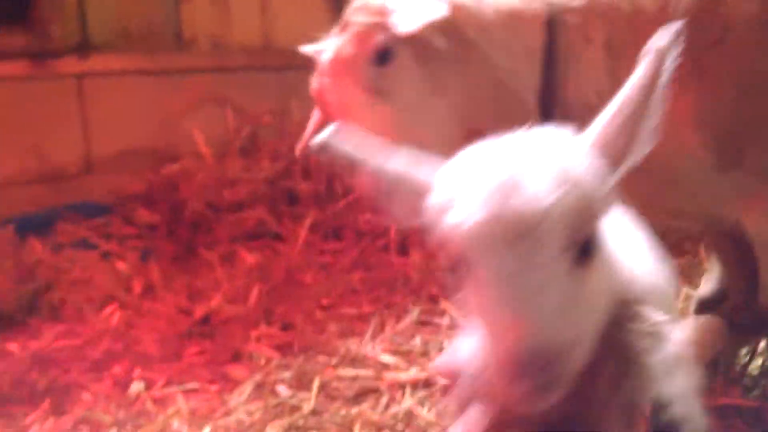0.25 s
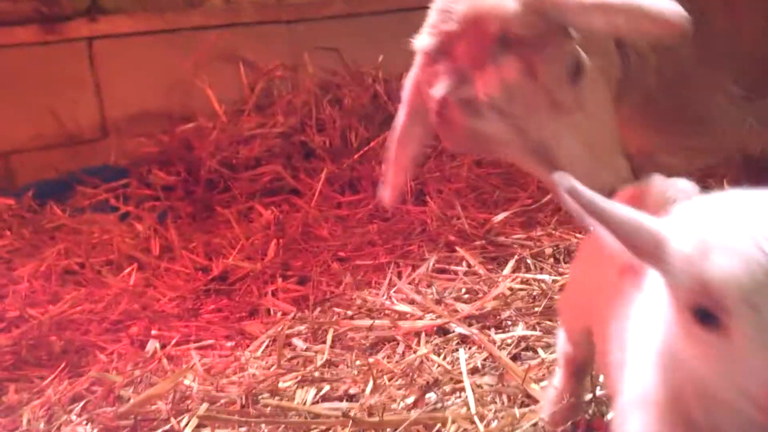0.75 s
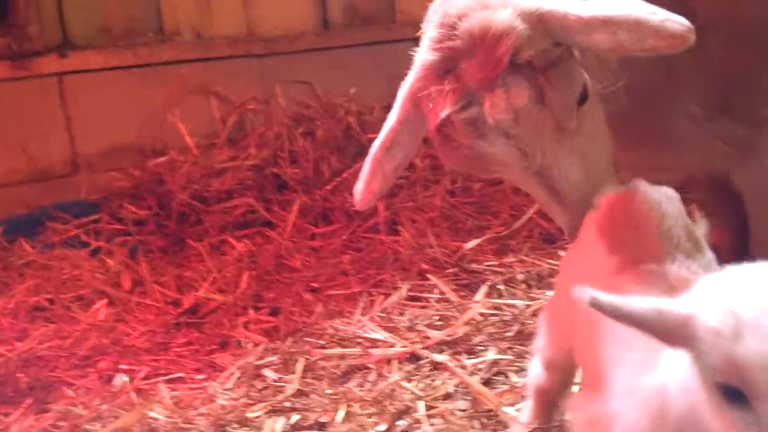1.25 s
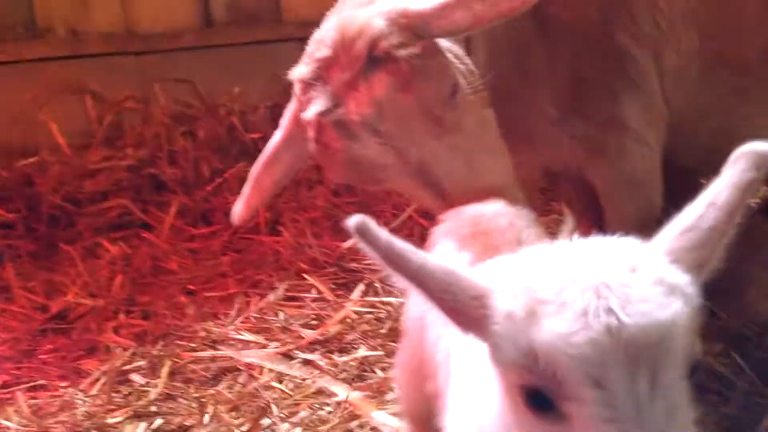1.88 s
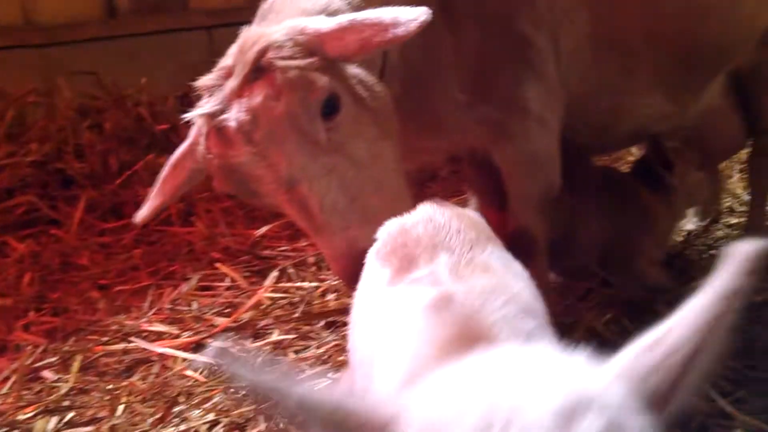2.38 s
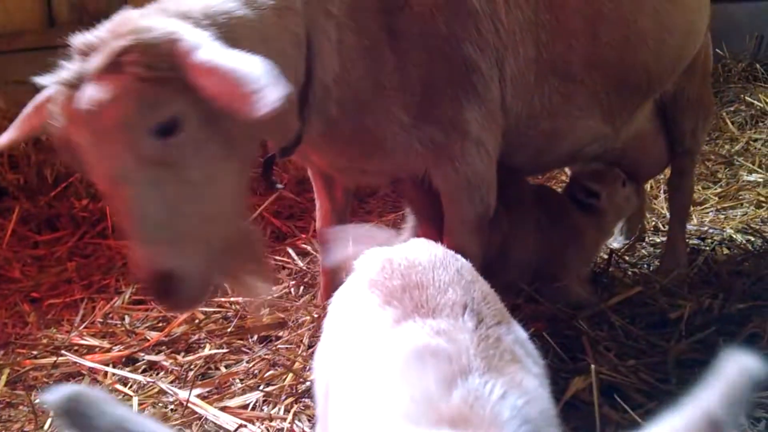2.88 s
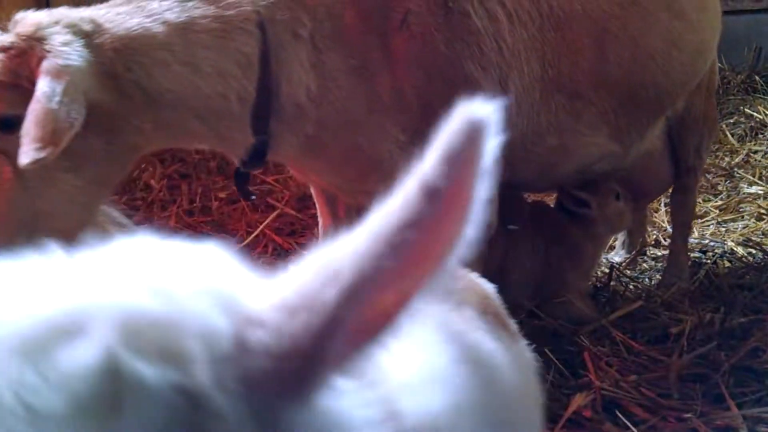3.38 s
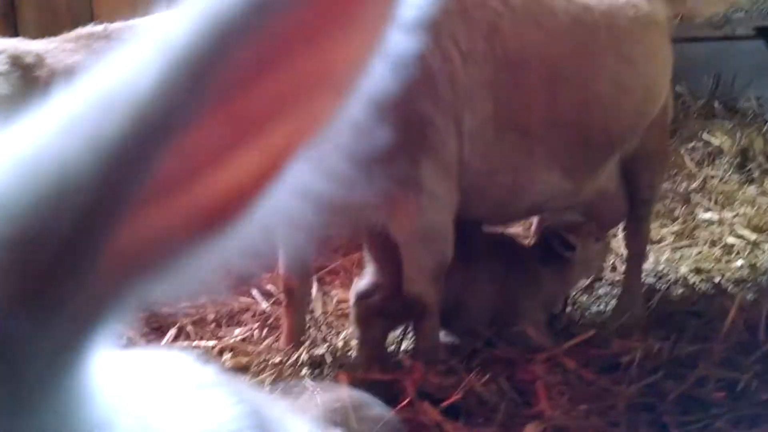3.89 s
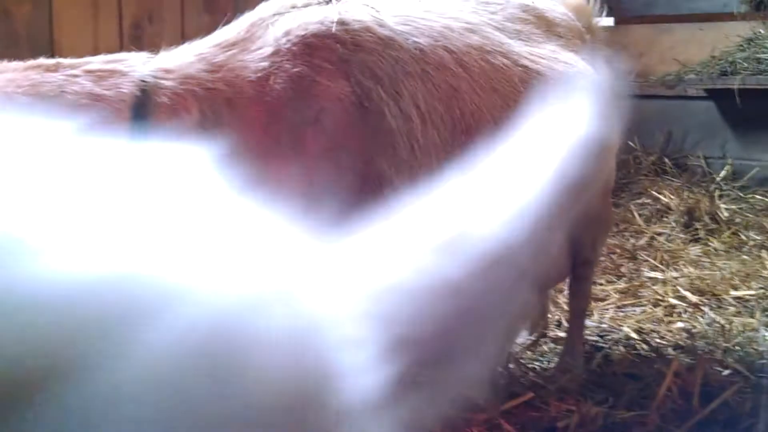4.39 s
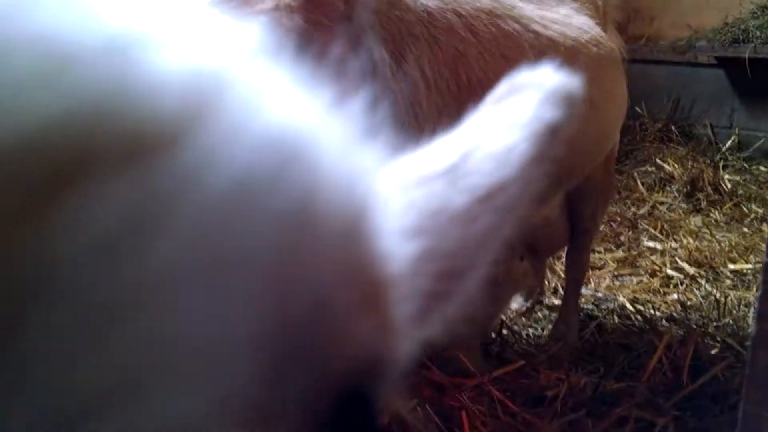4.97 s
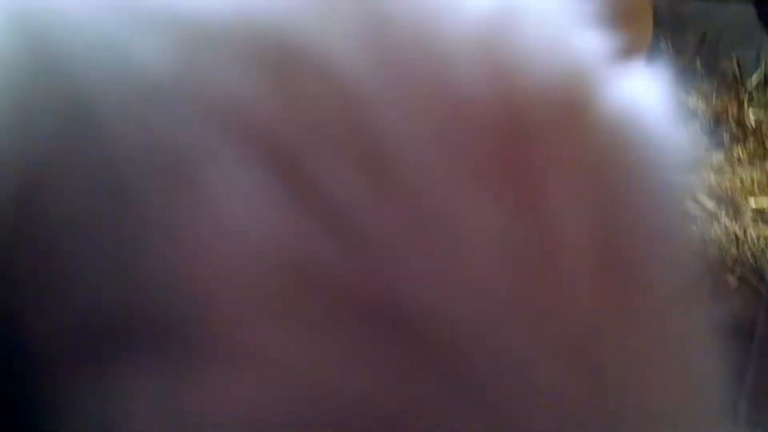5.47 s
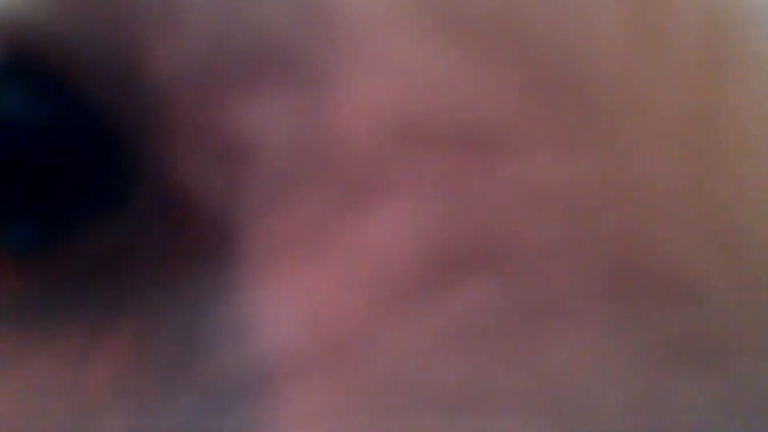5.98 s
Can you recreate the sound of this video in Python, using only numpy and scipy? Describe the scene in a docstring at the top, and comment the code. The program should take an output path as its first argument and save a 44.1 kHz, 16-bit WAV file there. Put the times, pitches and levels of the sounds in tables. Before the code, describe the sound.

A goat pen in a barn, heard close, with wide, slightly phasy stereo and brief diffuse echoes. From 0 to 1.3 seconds a young goat gives five short, nasal, cracking bleats, each about a fifth of a second, near 480 hertz. A hoarse growl follows at 1.3, thin squeaky tones at 1.5 to 1.9 and another growl at 1.7. A longer bleat rises from 1.9 to 2.4, ending in a growl, then rough quavering cries follow at 2.5, 2.8, 3.1, 3.55 and 4.0. Throughout, dry straw rustles, crackles and crunches under hooves, strongest until 4.4, with sharp stalk snaps, a tick at 3.5 and dull bumps near 4.2. After a quieter gap, faint wavering squeaks at 4.75 to 5.1 run into low, rattling growls at 4.85, 5.4, 5.65 and 5.9, dying away by about 6.3 over light straw and soft air.

```python
"""Cracked cries and growls in a goat pen

In a barn an animal gives a run of short, cracking cries, with hoarse growls among and after them.
The voice is pulse trains and noise shaped by resonances; thin tones break through it.
Goats shuffle through straw close by, made of shaped noise, with a few clicks, ticks and damped bumps.
The barn answers with brief diffuse echoes, in a wide, phasy stereo image."""
import sys
import numpy as np
from scipy import signal
from scipy.fft import rfft, irfft, next_fast_len
from scipy.io import wavfile
from scipy.ndimage import uniform_filter1d

SR = 44100
rng = np.random.default_rng(int(sys.argv[2]) if len(sys.argv) > 2 else 0)


def wrap_up_sound(samples):
    """Save the sound to the file named by the first command line argument, as 16-bit audio."""
    columns = np.atleast_2d(samples).T
    # keep every value between -1 and 1, then stretch to whole-number steps
    tamed = np.clip(columns, -1, 1)
    steps = np.round(tamed * 32767).astype(np.int16)
    wavfile.write(sys.argv[1], SR, steps)


N = 275447
TIME = np.arange(N) / SR

# animals stirring between steps: t/s, relative straw level/dB, relative level of their bodies' dull sound/dB
STIRRING = [(0, -49, -55.5), (.7, -45.5, -57.5), (1.05, -45.5, -57.5), (1.5, -43, -54.5), (2.7, -57, -56.5),
            (3.3, -35, -56.5), (3.42, -46, -67), (3.55, -47, -55.5), (3.8, -43, -55), (4.2, -54, -58),
            (4.6, -49, -60.5), (4.85, -57, -65), (5.35, -50, -61), (5.7, -51.5, -57.5), (6.05, -48.5, -49),
            (6.25, -57, -58)]
# spectrum of a stalk breaking: f/Hz, level/dB
SNAP_SPECTRUM = [(1000, -22), (4000, -12.5), (8000, -3.5), (14000, 1.5)]


def gain_of(db):
    """Level definition: an amplitude ratio is 10 to the power dB/20."""
    return 10 ** (np.asarray(db) / 20)


def evened(x):
    """Energy normalisation: scales to rms 1."""
    return x / np.sqrt(np.mean(x ** 2) + 1e-20)


def read(points, hz):
    """Spectral interpolation: reads a table along a log-frequency axis."""
    f, value = np.transpose(points)
    return np.interp(np.log(hz + 1), np.log(f + 1), value)


def follow(rows, t):
    """Linear interpolation in time: the columns of a curve table at times t."""
    s, *columns = np.transpose(rows)
    return [np.interp(t, s, c) for c in columns]


def add(mix, s, sound):
    """Superposition: mixes a sound in at time s."""
    part = mix[..., max(round(s * SR), 0):][..., :sound.shape[-1]]
    part += sound[..., :part.shape[-1]]


def filtered(x, gain):
    """Linear filtering: multiplies the spectrum by a gain given as a function of frequency."""
    size = next_fast_len(x.shape[-1] + 2048)
    spectrum = rfft(x, size) * gain(np.fft.rfftfreq(size, 1 / SR))
    return irfft(spectrum, size)[..., :x.shape[-1]]


def colour(x, points):
    """Spectral shaping: filters x by a spectrum table, at rms 1."""
    return evened(filtered(x, lambda hz: gain_of(read(points, hz))))


def low_pass(f, cut_hz, power):
    """Low-pass response: gain one half at cut_hz, steeper for a higher power."""
    return 1 / (1 + (f / cut_hz) ** power)


def wander(size, rate_hz):
    """Band-limited random modulation: Gaussian low-passed noise of rms 1."""
    return evened(filtered(rng.standard_normal(size), lambda hz: np.exp(-(hz / rate_hz) ** 2)))


def resonate(x, hz, width):
    """Moving resonance: shifts the curve hz to zero, smooths there and shifts back."""
    turn = np.exp(2j * np.pi * np.cumsum(hz) / SR)
    r = np.exp(-np.pi * width / SR)
    return 2 * (turn * signal.lfilter([1 - r], [1, -r], x / turn)).real


def background(jostle_db=4.0, sway_db=2, sway_hz=8, air_db=-57):
    """Broadband noise: dull, uneven movement of the animals over the steady air of the barn."""
    # spectrum of the bodies: f/Hz, level/dB
    dull_spectrum = [(20, -1), (60, 11.5), (120, 4.5), (190, 2), (300, 6.5), (600, -3.5), (2000, -28.5)]
    # spectrum of the steady air: f/Hz, level/dB
    air_spectrum = [(20, 50.5), (200, -9), (500, 23), (1000, 15), (1900, 31), (2400, 20), (3500, 27.5),
                    (16000, -83)]
    level_db = follow(STIRRING, TIME)[1] + jostle_db + sway_db * wander(N, sway_hz)
    jostle = colour(rng.standard_normal((2, N)), dull_spectrum) * gain_of(level_db)
    air = colour(rng.standard_normal((2, N)), air_spectrum)
    return jostle + gain_of(air_db) * air


def shuffles(width=0.38):
    """Band-limited noise: a body shifts its weight on the bedding in a rumble that swells and dies."""
    # heavy shuffles: t/s, length/s, level/dB, centre f/Hz
    shuffle_rows = [(1.25, .24, -47, 210), (2.4, 0.14, -44, 340), (2.9, .32, -54.5, 159),
                    (3.15, 0.48, -53, 156), (3.48, 0.082, -52, 44.8), (3.58, .14, -53, 310),
                    (3.72, 0.2, -52, 115), (5.12, 0.21, -56, 188), (5.4, 0.099, -50, 200)]
    out = np.zeros((2, N))
    for s, length, db, hz in shuffle_rows:
        size = int(length * SR)
        noise = rng.standard_normal((2, size))
        rumble = filtered(noise, lambda f: np.exp(-(np.log((f + 1) / hz) / width) ** 2))
        add(out, s, gain_of(db) * evened(rumble) * signal.windows.tukey(size, .7))
    return out


def bumps():
    """Damped oscillation: each bump or short tick is one heavily damped ring, in the middle channel."""
    # bumps and ticks close by: t/s, level at onset/dB, ring f/Hz, 60 dB decay time/s
    bump_rows = [(1.268, -33.5, 196, 0.23), (3.484, -17, 800, 0.0049), (2.8, -37, 160, 0.099),
                 (3.81, -21.5, 460, 0.018), (3.7, -35, 255, 0.072), (4.19, -28.5, 283, 0.037),
                 (4.217, -27, 83, 0.07), (4.216, -24, 253, 0.017), (6.01, -49, 160, 0.26)]
    out, t = np.zeros((2, N)), np.arange(SR // 2) / SR
    for s, db, hz, t60 in bump_rows:
        add(out[0], s, -gain_of(db - 60 * t / t60) * np.sin(2 * np.pi * hz * t))
    return out


def snaps(t60=0.0071, level_db=-5):
    """Impulsive fracture: a dry stalk breaks in one short bright burst of decaying noise."""
    # single stalks: t/s, relative level/dB
    snap_rows = [(0.4918, -19), (0.7317, -30), (0.871, -22), (0.985, -19), (1.706, -16), (1.888, -19),
                 (1.959, -18), (2.002, -16), (3.017, -19), (3.3369, -15), (4.053, -20), (4.155, -16.5),
                 (4.357, -25), (4.579, -23.5), (5.556, -14), (5.7879, -23), (5.8975, -28)]
    out, t = np.zeros((2, N)), np.arange(2000) / SR
    for s, db in snap_rows:
        burst = colour(rng.standard_normal((2, len(t))), SNAP_SPECTRUM)
        add(out, s, gain_of(db + level_db - 60 * t / t60) * burst)
    return out


def treading():
    """Power addition: each step swells and fades over the steady stirring; gives the rustle's strength."""
    # steps and scuffs: t at the loudest/s, relative level/dB, rise/s, fall/s
    step_rows = [(0.057, -36, 0.61, 0.94), (0.283, -37, 0.073, 0.34), (0.438, -26, 0.11, 0.071),
                 (0.518, -25.5, 0.35, 0.13), (0.887, -30, 0.075, 0.085), (0.983, -41, 0.12, 0.034),
                 (1.16, -46, 0.43, 0.044), (1.267, -32, 0.36, 0.13), (1.387, -34.5, 0.4, 0.17),
                 (1.704, -34, 0.042, 0.05), (1.78, -33, 0.16, 0.14), (1.908, -31, 0.32, 0.21),
                 (1.99, -39, 0.19, 0.17), (2.055, -36.5, 0.16, 0.1), (2.222, -34, 0.23, 0.05),
                 (2.348, -30.0, 0.34, 0.35), (2.482, -31.5, 0.25, 0.17), (2.601, -39, 0.04, 0.92),
                 (2.674, -30.5, 0.34, 0.027), (2.765, -25, 0.21, 0.19), (2.84, -32, 0.12, 0.15),
                 (3.04, -30, 0.16, 0.094), (3.133, -37.0, 0.09, 0.13), (3.256, -32, 0.053, 0.11),
                 (3.337, -38.5, 0.34, 0.057), (3.615, -35.5, 0.081, 0.2), (3.691, -35, 0.067, 0.12),
                 (3.821, -32.5, 0.1, 0.31), (3.893, -31, 0.21, 0.11), (4.065, -32, 0.084, 0.1),
                 (4.159, -35, 0.083, 0.18), (4.22, -32, 0.15, 0.07), (4.29, -40, 0.11, 0.14),
                 (4.359, -34, 0.065, 0.086), (4.447, -39, 0.18, 0.043), (5.411, -37.5, 0.07, 0.37),
                 (5.462, -42, 0.08, 0.05), (5.554, -35.5, 0.078, 0.31), (6.02, -44, 0.067, 0.26),
                 (6.19, -40.5, 0.21, 0.68)]
    drop_db = -27  # level against the peak at the ends of rise and fall
    power = gain_of(follow(STIRRING, TIME)[0]) ** 2
    for s, db, rise, fall in step_rows:
        away = np.maximum((s - TIME) / rise, (TIME - s) / fall)
        power = power + gain_of(db + drop_db * np.minimum(away, 10)) ** 2
    return np.sqrt(power)


def straw(level_db=1.5, cracks_per_s=1100, spread_db=7, crackle=0.43, crunch_db=-19, crunch_growth=0.79):
    """Random impulse noise: sliding stalks hiss, tiny snaps crackle, a dull crunch grows more slowly."""
    # spectrum of the sliding stalks: f/Hz, level/dB
    hiss_spectrum = [(600, -21), (1500, -2.5), (2400, -9), (3300, -0.5), (5000, -1), (8000, 1), (10000, 2),
                     (12500, 0.5), (14500, 3), (16000, 5)]
    # spectrum of straw packed down under a hoof: f/Hz, level/dB
    crunch_spectrum = [(100, -17), (250, -4), (500, 2), (1200, 0), (2000, -7), (2500, -27.5)]
    flicker_db, flicker_hz = 1.2, 35  # uneven sliding within a step
    crack_decay_s = 0.00049  # of the power
    size_db = spread_db * np.minimum(rng.exponential(1, N), 4)
    cracks = gain_of(size_db) * (rng.random(N) < cracks_per_s / SR)
    power = signal.lfilter([1], [1, -np.exp(-1 / (crack_decay_s * SR))], cracks ** 2)
    hiss = colour(rng.standard_normal((2, N)), hiss_spectrum)
    crackling = colour(np.sqrt(power) * rng.standard_normal((2, N)), SNAP_SPECTRUM)
    crunch = colour(rng.standard_normal((2, N)), crunch_spectrum)
    weight = treading() * gain_of(flicker_db * wander(N, flicker_hz))
    rustle = gain_of(level_db) * weight * (hiss + crackle * crackling)
    return rustle + gain_of(crunch_db) * weight ** crunch_growth * crunch


def scatter(x, bounce, gaps_s):
    """All-pass scattering: repeated bounces off near surfaces smear each pulse without colouring it."""
    def all_pass(hz):
        delays = np.exp(-2j * np.pi * np.outer(gaps_s, hz))
        return np.prod((delays - bounce) / (1 - bounce * delays), axis=0)
    return filtered(x, all_pass)


def echoes(x, t60, count=5):
    """Diffuse reverberation: a decaying tail whose random echo patterns take turns at a steady rate."""
    t, out = np.arange(SR * 3 // 4) / SR, np.zeros(N)
    place = TIME * 14  # echo patterns passed so far
    echoes_per_s, build_up_s = 2500, 0.0031
    for k in range(count):
        taps = rng.choice([-1., 1.], len(t)) * (rng.random(len(t)) < echoes_per_s / SR)
        taps *= gain_of(-60 * t / t60) * np.minimum(t / build_up_s, 1)
        # each pattern crossfades into the next
        share = np.cos(np.pi / 2 * np.minimum(abs((place - k) % count - count / 2), 1))
        out += signal.fftconvolve(x * share, taps / np.linalg.norm(taps))[:N]
    return out


def pen_ring(x):
    """Modal resonance: a few modes between the walls keep ringing after each call."""
    # lingering modes: f/Hz, time to fall by about 26 dB/s, strength/dB
    mode_rows = [(500, 0.38, -23), (944, 0.7, -11), (990, 0.81, -13)]
    return sum(gain_of(db) * resonate(x, np.full(N, hz), 0.97 / fall_s) for hz, fall_s, db in mode_rows)


def barn(clear, hoarse, growl, t60=0.31, tail_db=-2.5, wall_t60=0.11, across_db=-2, bounce=0.58,
         clear_tail_db=-8, growl_bounce=.55, growl_db=-1, growl_wet_db=-3):
    """Direct and diffuse fields: the voice and its scatter lie in the middle, wall echoes all round."""
    gaps_s = [.0013, .0029, .0047]
    near_hoarse = 0.62 * scatter(hoarse, bounce, gaps_s)
    near_growl = gain_of(growl_db) * scatter(growl, growl_bounce, gaps_s)
    voice = clear + hoarse + growl
    sent = hoarse + gain_of(growl_wet_db) * growl + gain_of(clear_tail_db) * clear
    tail = gain_of(tail_db) * echoes(sent, t60)
    mid = clear + near_hoarse + near_growl + pen_ring(voice) + tail
    side = gain_of(across_db) * echoes(voice, wall_t60) + gain_of(tail_db) * echoes(voice, t60)
    return np.array([mid, side])


def voiced(x, effort_db):
    """Envelope control: levels x to the effort curve, with a quick start and end."""
    power = uniform_filter1d(x ** 2, size=1000) + 1e-9
    return gain_of(effort_db) * x / np.sqrt(power) * signal.windows.tukey(len(x), 400 / len(x))


def squeak(s, length, start_hz, end_hz, db, octave_db, unsteady):
    """Frequency modulation: the hoarse voice catches on a short, unsteady tone with its octave."""
    size = int(length * SR)
    fade_db = -7 * np.linspace(0, 1, size)
    hz = np.linspace(start_hz, end_hz, size) * (1 + unsteady * wander(size, 170))
    phase = 2 * np.pi * np.cumsum(hz) / SR
    tone = np.cos(phase) + gain_of(octave_db) * np.cos(2 * phase)
    return s, voiced(tone, db + fade_db)


def push(t, swell, hold, release):
    """Breath pressure: the share of swell still to come and of release passed, each 0-1."""
    return np.clip(1 - t / swell, 0, 1), np.clip((t - swell - hold) / release, 0, 1)


def rasp(row, drift=0.015, onset_chest_db=3, throat_db=-7, throat_width_hz=70):
    """Source and filter: slowly flapping folds growl, slaps and air passing drifting resonances."""
    # throat spectrum of the growl: f/Hz, level/dB
    hoarse_spectrum = [(120, -46), (190, -13.5), (270, -22), (430, -0.5), (580, 1), (700, 1), (800, 1),
                       (930, 1), (1150, -3), (1360, -0.5), (1480, -10), (1580, -8), (1900, -13),
                       (2100, -16), (2350, -26), (2900, -14.5), (3400, -21.5), (3850, -32), (4400, -28.5),
                       (5400, -31), (6200, -26.5), (7200, -35), (9000, -42.5)]
    release_end_db = -15
    pulse_db, pulse_hz = 2, 41.7  # uneven pulsing of the effort
    flap_drift, flap_jitter = .04, .12  # slow and quick unevenness, as shares of the rate
    slap_spread_db, air_share = 3.5, .45
    nasal_hz, nasal_width_hz = 3790, 250
    (start, swell, hold, release, onset_db, top_db, chest_db, mouth_hz, width_hz, ring_db,
     upper_hz, upper_db, nasal_db, flap_hz, throat_hz) = row
    t = np.arange(0, swell + hold + release, 1 / SR)
    size = len(t)
    opening, closing = push(t, swell, hold, release)
    effort_db = top_db + onset_db * opening + release_end_db * closing + pulse_db * wander(size, pulse_hz)
    jaw = 1 + drift * wander(size, 8.6)

    # one slap for each flapping cycle, with most air just after it
    rate_hz = flap_hz * np.exp(flap_drift * wander(size, 12) + flap_jitter * wander(size, 150))
    cycles = np.cumsum(rate_hz) / SR
    slaps = np.diff(np.floor(cycles), prepend=0) * gain_of(slap_spread_db * rng.standard_normal(size))
    air = evened((.4 + np.exp(-(cycles % 1) / .3)) * rng.standard_normal(size))
    drive = evened(slaps) + air_share * air

    def twice(x, hz, first_hz, second_hz):
        """Cascaded resonance: two passes of given widths, at rms 1."""
        return evened(resonate(resonate(x, hz * jaw, first_hz), hz * jaw, second_hz))

    throat = colour(drive, hoarse_spectrum)
    under = filtered(throat, lambda f: low_pass(f, 830, 16))
    throat_ring = evened(resonate(under, throat_hz * jaw, throat_width_hz))
    hollow = evened(under) + gain_of(throat_db) * throat_ring
    ring = twice(throat, mouth_hz, width_hz, 600)
    upper = twice(drive, upper_hz, 400, 370)
    nasal = twice(drive, nasal_hz, nasal_width_hz, nasal_width_hz)
    mouth = evened(throat - under) + gain_of(ring_db) * ring
    mouth = mouth + gain_of(upper_db) * upper + gain_of(nasal_db) * nasal
    chest_effort_db = effort_db + chest_db + onset_chest_db * opening
    return start, voiced(mouth, effort_db) + voiced(hollow, chest_effort_db)


def cry(curve, quaver=0.0053, half_depth=1.8, flutter_depth=2.25, flutter_ratio=.26, shimmer_db=5.0,
        split_hz=1650, ring_db=-1.86, low_db=-2, body_db=0.84, bright_db=3, edge_db=-7, edge_rough=2,
        upper_db=8, upper_width_hz=230):
    """Nonlinear fold vibration: clear harmonics; roughness doubles the period, flutters and leaks air."""
    # throat spectrum of the cries: f/Hz, level/dB
    throat_spectrum = [(200, -24), (380, -21.5), (490, -6), (640, -17), (760, -7), (980, 2.5), (1110, 4.5),
                       (1250, -3), (1480, -12.5), (1680, -16), (1950, -16), (2250, -58), (2480, -16.5),
                       (2750, 0), (3500, -1.5), (6200, -12.5), (9000, -52)]
    # how the voice breaks up: t/s, roughness 0-1, share of period doubling against flutter 0-1,
    # upper resonance f/Hz
    breakup_rows = [(0.04, 0.34, 0, 2990), (.1, 0.2, 0.22, 2990), (.29, 0.83, 0.22, 3000),
                    (.37, 0.52, 0.53, 3000), (.55, 0.43, 0.09, 3120), (.8, 0.46, 0.22, 2980),
                    (1.25, 0.63, 0.2, 3020), (1.95, 0.7, 0.4, 3220), (2.08, 0.46, 0.35, 3220),
                    (2.17, 0.8, 0.7, 3100), (2.26, 0.2, 0.4, 3030), (2.35, 0.45, 0.48, 3030),
                    (2.54, 0.68, 0.85, 3000), (2.62, 0.2, 0.3, 2950), (2.86, 0.7, 0.7, 2990),
                    (2.95, 0, 0.3, 2970), (3.13, 0.46, 0.34, 3320), (3.21, 0.45, 0.75, 3360),
                    (3.6, 0.8, 0.2, 3280), (3.7, 0.21, 0.77, 3300), (3.82, 0.33, 0.65, 3280),
                    (4.2, 0.54, 0.58, 3160)]
    jitter = .005  # quick unsteadiness as a share of the pitch, before roughness scales it
    tremor_db, tremor_hz = 0.5, 30
    air_share = .4  # air noise at full roughness
    overtone_clarity = .8  # clean pulses mixed into the overtones
    clear_shimmer_db = 2  # trembling of the clear harmonics at full roughness
    start = curve[0][0]
    t = np.arange(start, curve[-1][0], 1 / SR)
    size = len(t)
    hz, ring, low, body, bright = follow(curve, t)
    rough, doubling, upper_hz = follow(breakup_rows, t)
    tremor = tremor_db * wander(size, tremor_hz)
    unsteady = quaver * wander(size, 42.0) + jitter * (.5 + 2 * rough) * wander(size, 135)
    phase = 2 * np.pi * np.cumsum(hz * (1 + unsteady)) / SR

    # period doubling puts lines halfway between the harmonics; a slower flutter adds sidebands
    half = half_depth * doubling * np.cos(phase / 2 + 0.5 * wander(size, 22))
    flutter_phase = flutter_ratio * phase + 1.24 * wander(size, 34.6)
    flutter = flutter_depth * (1 - doubling) * np.cos(flutter_phase)
    pulses = sum(np.cos(k * phase) for k in range(1, 15))
    shimmer = gain_of(shimmer_db * np.sqrt(rough) * wander(size, 78))
    folds = pulses * (1 + rough * (half + flutter)) * shimmer
    puffs = evened((1 + 2.0 * np.cos(phase)) * rng.standard_normal(size))

    # one steady copy of the two lowest harmonics is taken out here; the clear part sounds them
    upper_folds = evened(folds - np.cos(phase) - np.cos(2 * phase))
    drive = (1 - rough ** 2) * upper_folds + air_share * rough * puffs
    throat = colour(drive, throat_spectrum)
    middle = filtered(throat, lambda f: low_pass(f, split_hz, 20))
    bright_drive = throat + overtone_clarity * colour(pulses, throat_spectrum)
    overtones = filtered(bright_drive, lambda f: low_pass(f, 2400, 20) * low_pass(split_hz, f + 1, 20))

    # the edge: high harmonics, with rough folds and air growing as the voice roughens,
    # through an upper resonance of the mouth
    def edge_gain(f):
        peak = np.exp(-((f - upper_hz.mean()) / upper_width_hz) ** 2)
        return (1 - low_pass(f, 2680, 40)) * gain_of(upper_db * peak)
    edge_drive = evened(pulses) + edge_rough * rough * (puffs + evened(folds))
    edge = filtered(colour(edge_drive, throat_spectrum), edge_gain)

    second_db = ring + ring_db + tremor + clear_shimmer_db * rough * wander(size, 47)
    first_db = low + low_db + tremor + clear_shimmer_db * rough * wander(size, 64)
    clear = voiced(np.cos(2 * phase), second_db) + voiced(np.cos(phase), first_db)
    hoarse = voiced(middle, body + body_db + tremor) + voiced(overtones, bright + bright_db)
    hoarse = hoarse + voiced(edge, (bright + body) / 2 + edge_db)
    return start, np.array([clear, hoarse])


def scene():
    """Superposition: the calls in the barn and all other sources, as middle and side."""
    # one curve per cry: t/s, pitch f/Hz, then relative levels: second harmonic ringing in the mouth/dB,
    # fundamental/dB, rough body of the voice/dB, overtones/dB
    cry_curves = [
        [(0.04, 454, -32, -42, -55, -52), (0.054, 454.4, -25, -48, -34, -47),
         (0.064, 489, -29, -34, -26.5, -39), (0.078, 494.2, -21.5, -32, -33, -51),
         (0.106, 482.5, -20, -33, -23.5, -41), (0.134, 508.7, -29, -26, -36, -33),
         (0.156, 501.6, -13, -32, -27, -50), (0.178, 516.5, -44, -33, -31.5, -41),
         (0.212, 475.5, -32, -46, -38.5, -65), (0.235, 496, -39, -38, -37, -55)],
        [(0.275, 518, -42, -47, -36, -50), (0.293, 492.3, -29.5, -43, -24, -59),
         (0.309, 474, -34, -36, -37, -32), (0.333, 480.6, -26, -40, -22, -47), (0.353, 512, -24, -27, -38, -32),
         (0.375, 493, -14, -28, -21.5, -54), (0.389, 494.4, -21.5, -39, -36, -51),
         (0.401, 487, -42, -56, -42, -52), (0.409, 505, -42, -37, -28, -46), (0.45, 500, -41, -57, -48, -59)],
        [(0.497, 459, -53, -65, -45, -48), (0.509, 470.4, -27, -56, -33, -41), (0.543, 474, -37, -49, -25, -40),
         (0.565, 484.4, -22, -33, -27, -42), (0.583, 496.4, -20, -36, -31.5, -41),
         (0.605, 492, -59, -36, -27, -49), (0.613, 492, -31, -72, -29, -58), (0.619, 510, -28, -47, -32, -52),
         (0.659, 484, -53, -63, -61, -70), (0.68, 496, -43, -61, -50, -59)],
        [(0.75, 451, -46, -61, -38, -58), (0.76, 465, -36, -43, -24, -54), (0.768, 467.7, -24.5, -63, -40, -41),
         (0.8, 468.4, -33, -52, -26.5, -37.5), (0.824, 473, -22, -39, -29, -39),
         (0.848, 476.6, -22, -39, -35, -41), (0.866, 466, -52, -46, -34, -34),
         (0.914, 468.7, -33, -41, -32.5, -60), (0.92, 460, -39, -63, -42, -59), (0.97, 471, -45, -66, -47, -68)],
        [(1.09, 484, -42, -67, -35, -56), (1.106, 456, -30.5, -42, -27.5, -50),
         (1.112, 470.7, -24, -59, -31, -48), (1.146, 467.6, -36, -53, -28, -42),
         (1.166, 476, -20, -41, -24.5, -45), (1.192, 482, -25, -57, -31.5, -44.5),
         (1.25, 482.7, -20.5, -36, -25.5, -37), (1.28, 483, -28, -49, -27.5, -38),
         (1.318, 486.5, -26, -33, -33, -60), (1.33, 494.6, -43, -44, -38, -52)],
        [(2.485, 499, -28, -44, -31, -55), (2.495, 495, -30, -36, -36, -42), (2.509, 499, -34, -36, -32, -33),
         (2.529, 521.7, -21, -27, -29, -35), (2.547, 544.3, -16, -30, -17.5, -56),
         (2.565, 532.5, -15.5, -32, -27, -36), (2.575, 535.5, -20, -44, -32, -57),
         (2.591, 504, -28, -32, -31, -36), (2.621, 491.8, -22.5, -27.5, -30.5, -35),
         (2.69, 473.3, -39, -46, -41, -62)],
        [(3.12, 458.4, -35, -48, -36, -49), (3.138, 458, -30, -52, -29.5, -48),
         (3.168, 471.8, -50, -49, -32, -39), (3.186, 487, -27, -33, -24.5, -44),
         (3.198, 491, -25.5, -33, -25, -35), (3.214, 490, -22.5, -31, -21.5, -51),
         (3.224, 490, -41, -34, -33, -54), (3.23, 471.4, -26, -36, -31, -50), (3.286, 501, -47, -58, -56, -67),
         (3.3, 494, -51, -61, -47, -59)],
        [(1.93, 386, -41, -38, -43, -54), (1.958, 425.2, -33, -36, -27, -54),
         (1.984, 431.3, -27.5, -31, -37.5, -50), (2.008, 447.4, -28.5, -65, -28, -41),
         (2.038, 459.8, -30.5, -39, -27, -44), (2.075, 468.7, -31.5, -38, -27, -45),
         (2.082, 480.7, -17, -46, -26, -43), (2.108, 492.7, -24.5, -46, -27, -38),
         (2.126, 500.4, -31, -29.5, -38, -34.5), (2.164, 499.8, -25, -23, -20, -44),
         (2.206, 500.4, -25.5, -34.5, -30, -38), (2.224, 492, -51, -27, -32, -31.5),
         (2.25, 509, -17.5, -25, -34, -42), (2.28, 506, -29.5, -28, -39, -31.5),
         (2.32, 502.2, -15.5, -25, -26, -43), (2.342, 516, -29, -26, -34, -35),
         (2.358, 504, -21, -20.5, -23, -35), (2.382, 510, -20, -32, -50, -56), (2.394, 512, -36, -38, -59, -56),
         (2.41, 495.3, -18, -45, -33, -53)],
        [(2.783, 455, -63, -61, -45, -55), (2.795, 464, -29, -52, -27, -47), (2.815, 483, -22, -35, -26.5, -42),
         (2.835, 484, -30, -33, -29, -37), (2.855, 507, -17.5, -24.5, -23.5, -38),
         (2.879, 506.4, -21, -28, -27, -44), (2.893, 508.6, -18, -31, -31, -42),
         (2.909, 520, -27, -38, -30, -38), (2.921, 466.5, -23, -39, -28, -36),
         (2.933, 486, -23.5, -39, -26.5, -37), (2.953, 478.6, -24, -38, -32, -38),
         (2.969, 503.5, -27, -31.5, -44, -38), (2.991, 478.6, -38, -37, -54, -59),
         (3.007, 461.4, -34, -65, -44, -49), (3.021, 466, -40, -57, -58, -58), (3.035, 490, -32, -70, -50, -60),
         (3.045, 470, -39, -64, -48, -61), (3.05, 462.0, -60, -77, -51, -53)],
        [(3.555, 445, -59, -56, -45, -61), (3.565, 453.5, -29.5, -47, -37, -46),
         (3.587, 443, -48, -36.5, -25.5, -56), (3.609, 444, -30, -51, -44, -35),
         (3.617, 447, -23.5, -49, -26.5, -51), (3.639, 425.7, -34, -50, -36, -38),
         (3.653, 466, -36, -55, -34, -43), (3.673, 473, -33, -43, -27, -40), (3.687, 474.3, -23, -37, -34, -35),
         (3.715, 493, -23.5, -36, -28.5, -40), (3.731, 477.7, -34, -40, -23, -37),
         (3.757, 497, -21, -25, -24, -55), (3.771, 507, -31, -27, -37, -25.5),
         (3.793, 474.6, -45, -48, -25, -54), (3.819, 494.6, -39, -34, -22.5, -43),
         (3.855, 503.7, -19, -25, -29.5, -37), (3.917, 505, -36, -51, -39, -61),
         (3.94, 512, -48, -50, -42, -60)],
        [(4.005, 483.4, -31, -56, -31, -57), (4.017, 498, -32, -42, -24, -50),
         (4.035, 494, -38, -32, -23.5, -41), (4.065, 507.6, -25, -23, -22, -48),
         (4.079, 504, -17, -25.5, -30, -42), (4.095, 511, -23, -23, -19.5, -35),
         (4.111, 513.6, -22, -30, -31, -42), (4.121, 506, -24, -43, -25, -42), (4.137, 474, -25, -47, -28, -37),
         (4.155, 474.5, -28, -31, -24.5, -39), (4.171, 480, -26, -30, -21.5, -53),
         (4.183, 486.7, -46, -41, -24, -38), (4.195, 489.6, -21, -31, -28, -48),
         (4.211, 507, -31, -34, -31, -41), (4.235, 495, -45, -37, -38, -55), (4.247, 480, -27, -45, -41, -55),
         (4.261, 503, -48, -42, -40, -58), (4.28, 501, -50, -45, -33, -60)],
    ]
    # thin tones: t/s, length/s, start f/Hz, end f/Hz, level at the start/dB, octave level/dB,
    # unsteadiness as a share of the pitch
    squeak_rows = [(1.508, 0.11, 1003, 999, -21.5, -37, .007), (1.704, 0.046, 1003, 973, -29, -32.5, 0.041),
                   (1.777, 0.026, 1013, 1000, -23.5, -30, 0.025),
                   (1.856, 0.024, 998, 1003, -21.5, -35, .012), (4.735, 0.031, 662, 635, -47, 2, .035),
                   (4.773, 0.072, 920, 830, -41, -31, 0.044), (4.82, 0.038, 645, 660, -41, -4, 0.04),
                   (4.868, 0.064, 545, 505, -39, -8, 0.035), (4.947, 0.15, 561, 572, -34.5, -7, 0.046)]
    # growls: t/s, swell/s, hold/s, release/s, onset against effort/dB, effort/dB, chest against effort/dB,
    # mouth resonance f/Hz, its first-pass width/Hz, its strength/dB, upper resonance f/Hz,
    # its strength/dB, nasal strength/dB, central flapping rate/Hz, throat resonance f/Hz
    growl_rows = [(1.31, 0.16, 0.1, 0.058, -6.5, -26.5, -9.5, 1055, 90, 5.5, 2727, -8, -20.5, 91.5, 547),
                  (1.735, .06, .135, 0.077, -8, -30, -7.5, 1045, 110, 4.5, 2900, -14, -34, 143.3, 553),
                  (2.387, .022, 0.086, 0.024, -1, -29.5, -8, 1047, 50, 2, 3064, -21, -33, 102.9, 520),
                  (4.729, 0.063, .04, .05, -3, -52, -2, 1300, 90, 2, 2870, -22, -26, 78, 716),
                  (4.831, .29, 0.16, .066, -18, -27.5, -5, 1056, 80, 1, 2820, -18, -23, 77.07, 570),
                  (5.385, .11, .09, 0.076, -10, -26.5, -4, 1090, 110, -6, 3500, -35, -35, 107.3, 576),
                  (5.631, 0.16, 0.08, 0.088, -9, -26, -5.5, 1262, 55, 0, 3380, -25, -28, 72.08, 630),
                  (5.92, 0.1, .096, 0.22, -9.5, -24, -7, 1293, 55, -1, 3180, -21, -29, 72.25, 683)]
    calls, growl = np.zeros((2, N)), np.zeros(N)
    clear, hoarse = calls
    for curve in cry_curves:
        add(calls, *cry(curve))
    for row in squeak_rows:
        add(clear, *squeak(*row))
    for row in growl_rows:
        add(growl, *rasp(row))
    voice = barn(clear, hoarse, growl)
    return voice + straw() + snaps() + bumps() + shuffles() + background()


def likeness(hz, comb_hz=2530):
    """Spatial coherence: left and right agree and oppose by turns up the spectrum, a wide, phasy image."""
    # left-right likeness in the bass: f/Hz, likeness -1 to 1
    bass_likeness = [(25, -0.86), (80, -0.75), (170, -0.035), (330, 0.39), (500, 0.71), (700, 0.7),
                     (1000, 0.88), (1300, 0.95)]
    # depth of the ripple above the bass: f/Hz, depth 0-1
    ripple_depth = [(1300, 0.82), (1900, 1), (2500, 1), (3800, 0.98), (5000, 0.82), (6400, 0.58),
                    (8000, 0.25), (16000, 0.5)]
    ripple = -np.cos(2 * np.pi * hz / comb_hz) * read(ripple_depth, hz)
    return np.clip(np.where(hz < comb_hz / 2, read(bass_likeness, hz), ripple), -1, 1)


def record(dry):
    """Sum and difference stereo: middle and side become left and right; then the band limit."""
    # left against right: f/Hz, level/dB
    balance = [(100, -0.5), (500, -2.5), (1100, -0.8), (2000, 0.56), (6000, 1), (14000, 2.4)]
    edge_hz = 15850
    signs = np.array([[1], [-1]])
    mid, side = filtered(dry, lambda hz: np.sqrt((1 + signs * likeness(hz)) / 2))
    pair = np.array([mid + side, mid - side])
    pair = filtered(pair, lambda hz: gain_of(signs / 2 * read(balance, hz)))
    band_limit = signal.firwin(511, edge_hz, window=("kaiser", 9), fs=SR)
    return signal.oaconvolve(pair, band_limit[None], "same")


dry = scene()
out = record(dry)
wrap_up_sound(out)
```